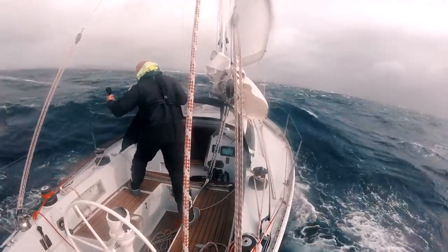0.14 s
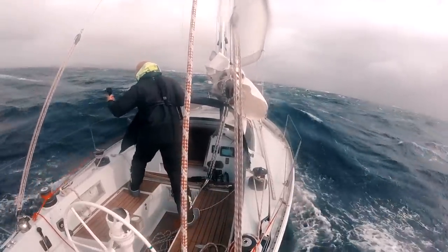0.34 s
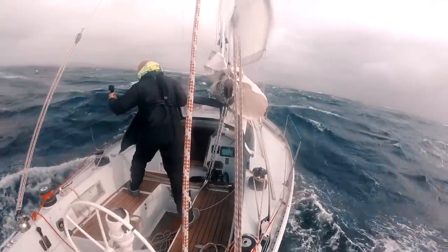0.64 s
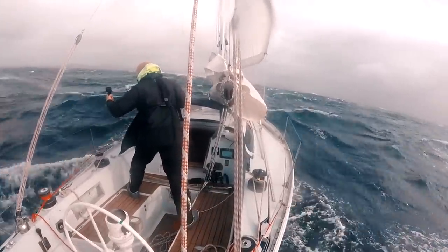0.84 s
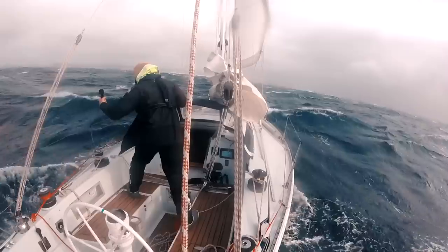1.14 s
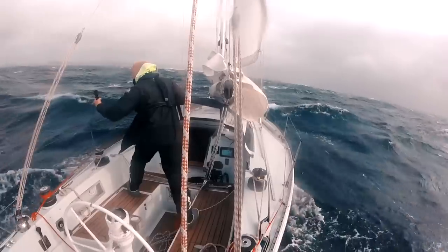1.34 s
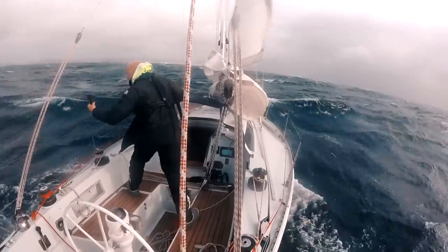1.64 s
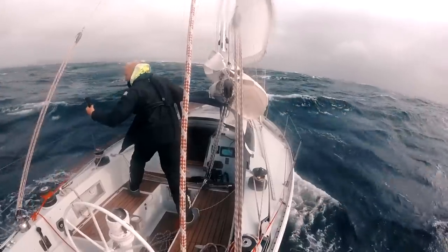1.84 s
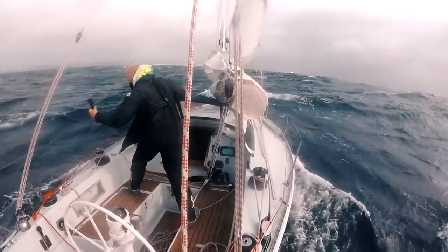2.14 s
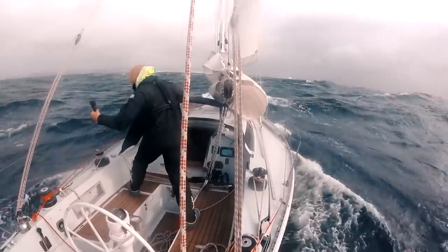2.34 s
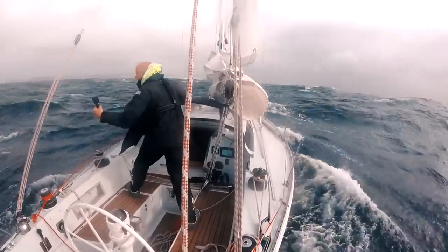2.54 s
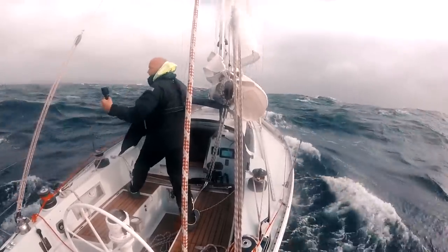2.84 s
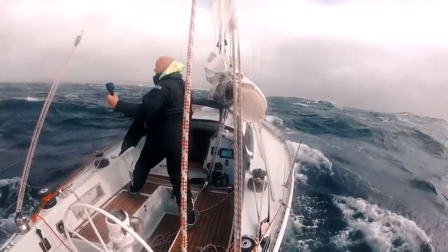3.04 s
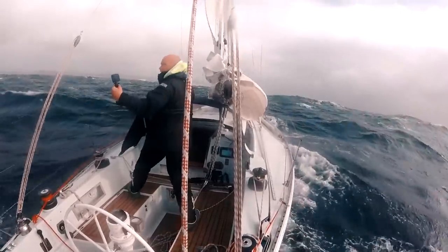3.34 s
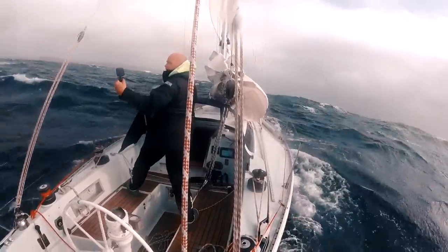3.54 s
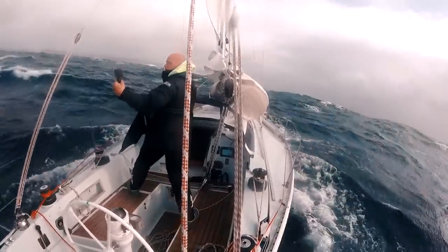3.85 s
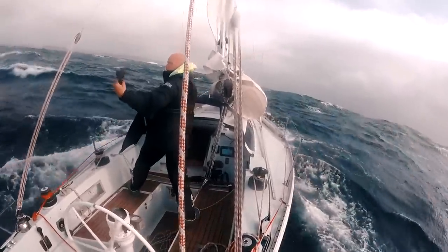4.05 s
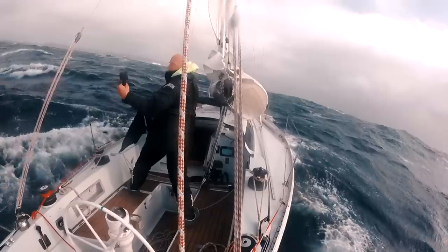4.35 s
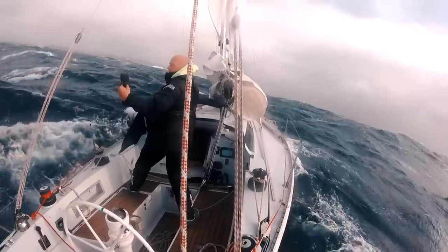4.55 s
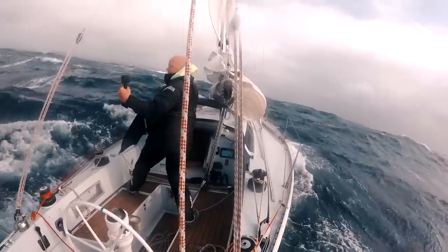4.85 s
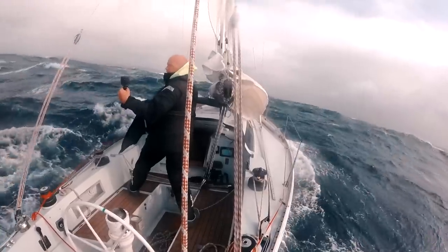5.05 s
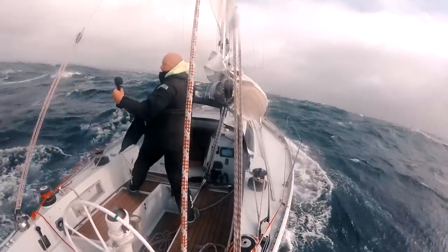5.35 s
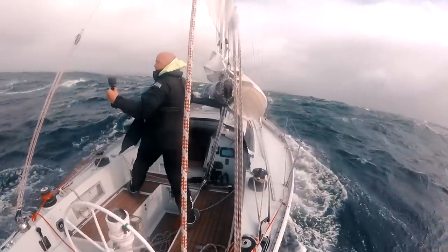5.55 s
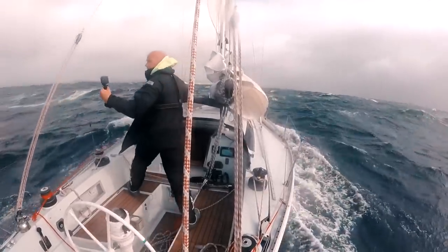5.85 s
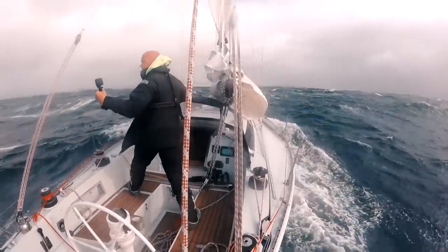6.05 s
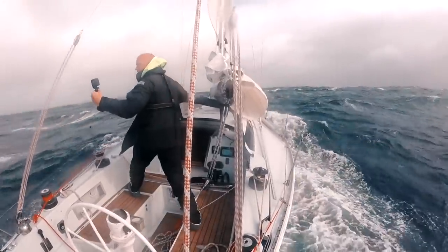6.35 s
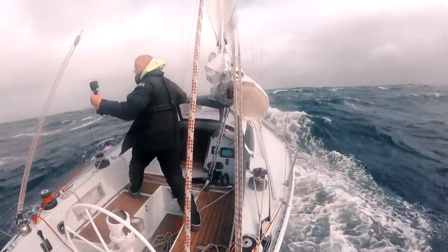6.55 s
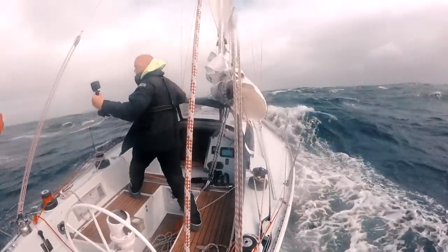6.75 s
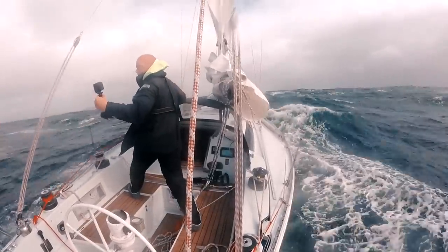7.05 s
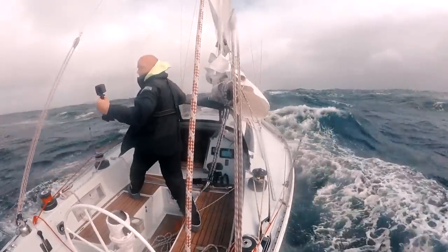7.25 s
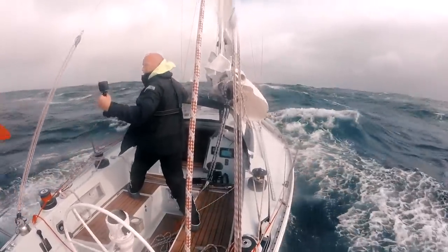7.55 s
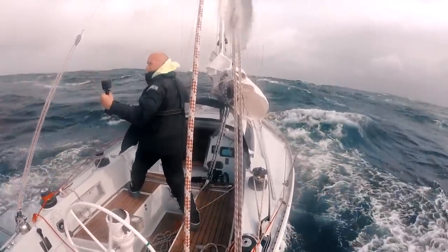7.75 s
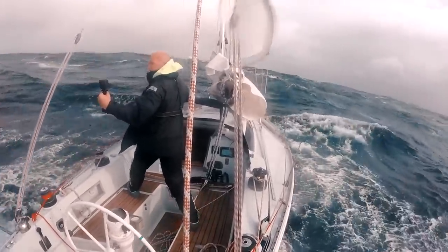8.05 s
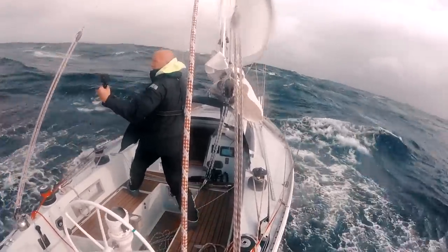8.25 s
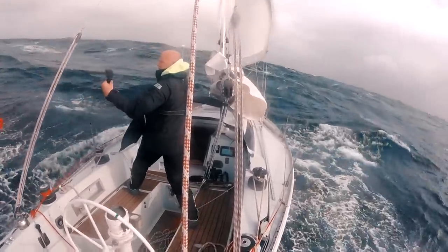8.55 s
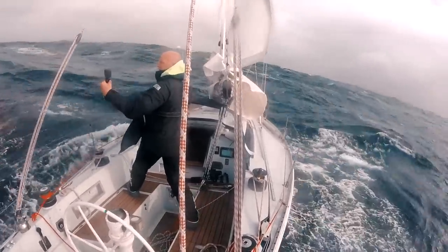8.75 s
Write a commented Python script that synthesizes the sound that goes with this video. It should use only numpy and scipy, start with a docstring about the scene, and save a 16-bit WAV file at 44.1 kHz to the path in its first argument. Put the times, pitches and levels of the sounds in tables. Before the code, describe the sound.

Strong wind buffets a microphone at the stern of a sailboat, making a heavy, uneven rumble throughout. Beneath it, water washes along the hull, foam fizzes and the rigging sings faintly. Two waves slap the boat early on, the second with a solid thud and a hiss of spray. A few drops then tick on the microphone's case, and near the end heavy gear clunks and a fitting knocks.

```python
"""A sailing yacht in a gale

Heard from a camera in a waterproof case at the stern, wind shakes the case with a heavy rumble and
sings in the wires that hold the mast. Water washes along the hull and its bubbles fizz as foam.
Now and then spray flies over, a drop ticks on the case, a wave slaps the boat or a pressure jump pops.
A tight rope squeaks; near the end, heavy gear clunks and a deck fitting knocks."""
import sys
import numpy as np
from scipy import signal
from scipy.fft import rfft, irfft, next_fast_len
from scipy.io import wavfile
from scipy.ndimage import uniform_filter1d, minimum_filter1d, map_coordinates

SR = 44100
rng = np.random.default_rng(int(sys.argv[2]) if len(sys.argv) > 2 else 0)


def waveform_to_disk(signal):
    """Save audio, clipped to [-1, 1], as 16-bit WAV at the path in sys.argv[1]."""
    frames = np.transpose(np.atleast_2d(signal))
    scaled = np.clip(frames, -1, 1) * 32767
    samples = np.round(scaled).astype(np.int16)
    wavfile.write(sys.argv[1], SR, samples)


N = 393061

# Levels in the tables are relative: the functions add their own gains.
# wind on the case between gusts: t/s, rumble level/dB, level of the eddies (small swirls of air)/dB
WIND = [(0, -2.5, -0.5), (.65, 0.5, 4), (1.25, -2.5, 0.5), (1.75, 0.5, -2), (2.05, -7, 0), (2.45, -1, 1),
        (2.75, -3.5, 2.5), (3.3, 1.5, -3.5), (3.7, -2.5, 2), (4.3, 0.5, 0), (5.05, -3.5, 0.5), (5.8, 2, -1),
        (6.55, -1.5, -1), (7.15, -3, 4.5), (8.05, -2, 2), (8.85, -1, 2)]
# gusts that strike the case: t/s, length/s, rumble rise/dB, eddy rise/dB
GUSTS = [(0.13, 0.017, 6, -3), (0.211, 0.053, 5.5, 10), (0.277, 0.022, 9, 11), (0.533, 0.019, -1, 2.5),
         (0.636, 0.049, -1.5, 4.5), (0.72, 0.046, 2.5, 6), (0.854, 0.026, 5, 4), (0.977, .035, 5, 2.5),
         (1.068, 0.044, 5, 9), (1.153, 0.038, 11.5, 4), (1.3, 0.042, 9, 3), (1.459, 0.086, 4, 6.5),
         (1.814, 0.045, 2, 1), (2.19, 0.046, 8, 8.5), (2.319, 0.071, 3, 8.5), (2.438, 0.022, 6, 1),
         (3.075, 0.033, 6.5, 8), (3.25, 0.1, 3.5, 6.5), (3.389, 0.047, 2.5, 8), (3.947, 0.024, 5.5, 7),
         (4.178, 0.06, 5.5, -1), (4.736, 0.1, 5.5, 6), (5.148, 0.095, 3.5, -4), (5.317, 0.042, 8, 9),
         (5.421, 0.049, 7, 2.5), (5.621, 0.021, 12.5, 14), (5.785, 0.028, 1.5, 9.5),
         (6.122, 0.091, 5.5, 8.5), (6.26, 0.045, 8.5, 9.5), (6.43, 0.092, -0.5, 6), (6.526, 0.037, 3, 12),
         (6.743, 0.067, 5.5, 10), (7.133, 0.017, 6.5, 13), (7.254, 0.13, 7.5, 4.5),
         (7.584, 0.027, 8.5, 2.5), (7.673, 0.026, 13, -6), (7.84, 0.053, 10.5, 6), (7.902, 0.049, 7, 1.5),
         (8.132, 0.044, 7.5, -2), (8.207, 0.029, 12.5, 2), (8.43, 0.061, 0.5, 6), (8.605, 0.059, 7.5, 2)]
# lulls, when the air briefly lets go of the case: t/s, length/s
LULLS = [(0.318, 0.037), (0.476, 0.054), (1.017, 0.019), (1.382, 0.02), (1.63, .025), (2.258, 0.059),
         (2.68, 0.043), (2.856, 0.019), (3.653, 0.11), (3.875, 0.074), (4.125, 0.016), (4.493, 0.031),
         (4.834, 0.051), (5.053, 0.021), (5.525, 0.21), (6.206, 0.042), (6.365, 0.05), (6.591, 0.041),
         (6.967, .03), (7.067, 0.017), (7.357, 0.083), (7.44, 0.024), (7.528, 0.037), (7.738, 0.098),
         (8.015, 0.014)]
# surges in the gale's roar: t/s, length/s, rise/dB
SURGES = [(0.252, .07, 3.5), (2.137, .1, 5.5), (3.195, 0.12, 6.5), (6.072, .07, 8), (6.933, 0.13, 4.5),
          (7.582, .04, 12.5), (8.325, 0.022, 1)]
# tone colours of the wind: f/Hz, level/dB
RUMBLE_TONE = [(5, -30.5), (12, 0.5), (25, 1), (35, 0.5), (48, 0.5), (70, -4), (95, -16), (140, -37),
               (220, -46), (400, -79.5), (900, -120)]
EDDY_TONE = [(50, -30.5), (85, 4), (110, 2), (145, -5), (200, -13), (270, -27), (330, -33.5), (600, -48.5),
             (1500, -74.5), (4000, -120)]
ROAR_TONE = [(100, -16), (190, 5), (280, 2), (330, -7), (420, -16.5), (520, -16.5), (900, -56)]
# notes of two singing wires and of the stays (thick mast cables): f/Hz, width/Hz, level/dB
WIRE_NOTES = [(648, 46, -63.5), (878, 56, -64.5)]
STAY_NOTES = [(400, 30, -61.5), (436, 140, -82)]
# swells in the singing: t/s, length/s, thick wire rise/dB, thin wire rise/dB
WIRE_SWELLS = [(3.134, 0.14, 3, 16), (3.644, 0.24, 7.5, 9), (5.322, 0.23, 6, 2), (7.025, 0.16, 13.5, 5),
               (7.72, 0.16, 9, -6), (8.055, 0.23, 8, 5)]

# water swelling as each wave passes: t/s, foam level/dB, spray level/dB
PASSING_WAVES = [(0, 0.5, 1), (.4, -5.5, -5.5), (.52, 1, -3), (.8, 2, 3), (1.08, -0.5, 0), (1.35, 3, 1.5),
                 (1.7, 1.5, 0), (2.1, 6.5, 1), (2.35, 0.5, 0.5), (2.72, 0, -2), (2.87, 3, 1),
                 (3.24, 1.5, 5), (3.5, 1.5, 0), (3.98, -4, -2), (4.22, -3, -3), (4.5, 4, 0), (4.85, -4, -3),
                 (5.9, -3, -4.5), (6.15, -3, -2), (6.32, 1.5, -0.5), (6.75, 0, 1), (7.25, 0, -0.5),
                 (7.75, -3.5, -3.5), (8.4, 2, 1), (8.85, 1.5, -2)]
# wave crests that break beside the hull: t/s, length/s, rise/dB
CRESTS = [(0.177, 0.1, 7), (0.712, 0.02, 1), (1.92, 0.031, 4), (2.119, 0.11, 4.5), (2.435, 0.03, 9.5),
          (2.517, 0.1, 5), (4.48, .04, 3.5), (6.047, 0.06, 6), (6.685, 0.11, 3.5), (7.105, 0.099, 4.5)]
# short sloshes against the hull: t/s, foam rise/dB
SLOSHES = [(1.27, 2), (1.39, 2.5), (4.1, 5.5), (4.19, 5), (4.27, 7.5), (4.365, 3.5), (4.57, 3.5),
           (4.655, 7), (4.745, 5), (4.93, 4.5), (5.035, 4.5), (5.315, 3.5), (8.425, 4)]
# strength of the low wash and of the fine mist: t/s, level/dB
WASH_LEVELS = [(0, -3), (.8, 1), (2.2, 0), (3, 1), (4.1, -1.5), (5.4, -1), (5.75, -2.5), (6.7, 0.5),
               (7.6, 0), (8.4, -0.5), (8.85, 0.5)]
MIST_LEVELS = [(0, 5), (.4, -2.5), (1, 4), (1.2, 1), (2, 0.5), (2.8, 0), (3.4, 1), (3.78, 4.5), (4, -0.5),
               (4.6, 0.5), (5, -2), (5.8, -3.5), (6.3, -4), (6.8, 0), (7.7, -2), (8.85, 0.5)]
# ring of the foam, higher for finer bubbles: t/s, f/Hz
FOAM_PITCH = [(0, 2500), (1.08, 2410), (1.6, 2640), (1.85, 2360), (2.3, 2440), (2.9, 2760), (3.25, 2810),
              (3.5, 2470), (4.3, 2370), (5.9, 2440), (6.3, 2730), (6.8, 2650), (7.5, 2310), (8.85, 2430)]
# the two rings that this pitch blends between: coarse foam f/Hz, fine foam f/Hz
FOAM_RINGS = [2360, 2730]
# tone colours of the water: f/Hz, level/dB
WASH_TONE = [(150, -25), (350, -8.5), (480, 6), (750, 3.5), (1300, 2.5), (1700, 0.5), (3000, -15.5),
             (8000, -40.5)]
FOAM_TONE = [(900, -31.5), (1550, -14.5), (1850, -7), (2400, -3.5), (3000, -4), (3800, -13), (5000, -14.5),
             (9000, -48.5)]
SPRAY_TONE = [(1500, -27.5), (3000, 7), (4000, 6), (5000, -0.5), (7000, -6), (8200, -14), (10000, -19.5),
              (11500, -32), (15800, -46.5)]
MIST_TONE = [(3000, -17.5), (6000, -7), (8000, -4.5), (10000, 0), (11500, -8), (14000, -15.5),
             (15800, -31.5)]
# sheets of water and spray: high hisses flying past, and one low swell of wash before a wave hits:
# t/s, half length/s, level/dB, start f/Hz, end f/Hz, width/Hz
WATER_SHEETS = [(0.23, .03, -51, 3250, 4520, 1900), (0.809, .07, -57, 4170, 4600, 1600),
                (2.135, 0.046, -52.5, 4200, 5200, 3000), (2.582, 0.048, -56, 5000, 6000, 3000),
                (3.078, .042, -43.5, 2900, 3600, 1700), (3.124, .04, -52, 5700, 6900, 1500),
                (3.167, .026, -56.5, 7980, 10400, 3200), (3.222, .08, -43, 600, 902, 1490),
                (4.511, .035, -51.5, 4000, 4600, 3200)]

# drops landing on the case: t/s, tick level/dB, tap level/dB
DROPS = [(2.101, -43.5, -59), (4.7208, -37.5, -38.5), (4.9615, -48, -41), (5.1574, -37, -42.5),
         (6.0017, -43.5, -65), (6.9163, -36.5, -57), (7.1148, -36.5, -53)]
# tone colour of a drop's tick: f/Hz, level/dB
TICK_TONE = [(1500, -15), (5200, 5), (8000, -3), (11000, 6), (15000, -5)]
# waves hitting the boat: t/s, rise/s, fall/s, thud level/dB, slap level/dB, splash level/dB
WAVE_HITS = [(2.201, 0.022, 0.0098, -27.5, -52, -40), (3.317, 0.014, 0.016, -14.5, -34.5, -61)]
# tone colours of a wave's hit: f/Hz, level/dB
THUD_TONE = [(60, -4.5), (150, 0.5), (260, 0.5), (350, -11.5), (460, -14), (700, -43), (2000, -77.5)]
SLAP_TONE = [(150, -9), (350, -8), (470, -6), (750, 5.5), (1150, 7), (1420, 0), (1750, -28), (4000, -33),
             (10000, -61.5)]
SPLASH_TONE = [(800, -17), (2000, 13), (3400, 1), (5000, 1), (7000, -12), (9000, -8), (12000, -35),
               (15800, -42.5)]
# pitches that the hull's panels boost or weaken: f/Hz, width/Hz, gain/dB
HULL_RINGS = [(467, 130, 1), (1220, 160, 0), (1400, 120, -7)]
# pressure jumps at the microphone opening: t/s, level/dB
POPS = [(3.314, -23), (3.333, -23), (6.123, -20.5), (7.278, -23)]

# squeak of a tight rope: t/s, f/Hz, level/dB
SQUEAK = [(5.21, 1793, -78), (5.228, 1725, -54), (5.275, 1760, -55), (5.29, 1810, -85)]
# heavy gear scrapes, clunks and settles: t/s, rise/s, fall/s, body level/dB, rattle level/dB
CLUNKS = [(7.95, .008, 0.044, -40, -64), (8.007, .002, .008, -32, -45), (8.012, 0.0025, 0.012, -25, -43.5),
          (8.025, 0.0036, .011, -26, -42.5), (8.04, 0.0022, .009, -38, -53),
          (8.051, .002, 0.0083, -31, -49), (8.074, .004, 0.027, -36, -58),
          (8.081, .002, 0.0064, -46, -44.5)]
# tone colours of its hollow body and loose parts: f/Hz, level/dB
BODY_TONE = [(70, -6), (130, 12), (310, 4), (560, -11.5), (850, -6.5), (1150, -12), (1500, -14),
             (1900, -34), (4000, -59)]
RATTLE_TONE = [(1200, -7), (2000, -13), (3200, 3), (4300, -6.5), (6000, -12.5), (8500, -19.5), (11500, -24),
               (15000, -39)]
# pitches at which that gear rings: f/Hz, width/Hz, gain/dB
GEAR_RINGS = [(860, 84, 3.5), (3200, 310, 5), (4250, 300, 5), (5900, 350, 6.5)]
# knock of a deck fitting: t/s, level/dB
KNOCKS = [(8.172, -41)]
# notes of that fitting: f/Hz, level/dB, time to fade by 60 dB/s
FITTING_NOTES = [(660, -1.5, 0.14), (1900, -3, .027), (2000, -2, .05), (2815, -6, .025), (3200, 6.5, .02),
                 (3700, 2, 0.027), (6750, -12, .018), (8550, -8, .016)]
# pitches that the camera case boosts or weakens: f/Hz, width/Hz, gain/dB
CASE_RINGS = [(1592, 150, -4.5), (1842, 180, 4), (3334, 290, -3.5), (4205, 300, -3.5), (4710, 300, 3),
              (5030, 370, -2.5), (5840, 440, 3.5), (6380, 400, -2), (7130, 650, 5)]


def amp(db):
    """Turn decibels into a gain to multiply by."""
    return 10 ** (np.asarray(db) / 20)


def unit(x):
    """Scale x to an average strength (rms) of 1."""
    return x / np.sqrt(np.mean(x ** 2) + 1e-20)


def clock():
    """The time of every sample, in seconds."""
    return np.arange(N) / SR


def curves(rows):
    """Join a table's points with straight lines: one curve for each column after the time."""
    times, *columns = np.transpose(rows)
    return [np.interp(clock(), times, column) for column in columns]


def wobble(rate):
    """A smooth curve through rate random points a second."""
    return map_coordinates(rng.standard_normal(4096), [clock() * rate + 2], mode="wrap")


def bump(s, length):
    """A smooth rise and fall centred on time s, above half its height for length seconds."""
    return .5 ** np.minimum((2 * (clock() - s) / length) ** 2, 100)


def strikes(rows):
    """Hits that build to a sharp peak and die away: one curve for each level column."""
    force = 0
    for s, rise, fall, *levels_db in rows:
        t = clock() - s
        force += np.outer(amp(levels_db), np.exp(-np.maximum(-t / rise, t / fall)))
    return force


def filtered(x, response):
    """Scale each frequency in x by the gain response(hz)."""
    size = next_fast_len(N + SR // 2)
    return irfft(rfft(x, size) * response(np.fft.rfftfreq(size, 1 / SR)), size)[:N]


def coloured(x, tone):
    """Give x the tone colour of a table of f/Hz, level/dB."""
    points_hz, db = np.transpose(tone)
    return filtered(x, lambda hz: amp(np.interp(np.log(hz + 1), np.log(points_hz), db)))


def peak(hz, centre, width):
    """A hill of height 1 around the centre frequency."""
    return 1 / (1 + (2 * (hz - centre) / width) ** 2)


def resonant(x, rings):
    """Boost or weaken x around each pitch in rings."""
    return filtered(x, lambda hz: amp(sum(db * peak(hz, centre, width) for centre, width, db in rings)))


def rush(tone, patchy_db):
    """Rushing noise, louder and softer in random patches of time and pitch."""
    grid = signal.stft(rng.standard_normal(N), nperseg=512)[2]
    patches = uniform_filter1d(rng.standard_normal(grid.shape), size=7, axis=0)
    patches = unit(uniform_filter1d(patches, size=10, axis=1))
    noise = signal.istft(grid * amp(patchy_db * patches), nperseg=512)[1][:N]
    return unit(coloured(noise, tone))


def steadied(x, span):
    """Even out the swells in x that are slower than span seconds."""
    window = signal.windows.hann(2 * int(span * SR / 2) + 3)
    power = signal.fftconvolve(x ** 2, window, "same") / signal.fftconvolve(np.ones(N), window, "same")
    return unit(x / np.sqrt(np.abs(power) + 1e-9))


def wind():
    """Big swirls shake the case, small ones tear off it in quick lumps, and the gale roars in the sails."""
    flurries_db = 0.5 * wobble(16)
    lulls_db = -6 * sum(bump(*lull) for lull in LULLS)
    gusts_db = sum(np.outer(rises_db, bump(s, length)) for s, length, *rises_db in GUSTS)
    rumble_db, eddy_db = curves(WIND) + gusts_db + flurries_db + lulls_db
    rumble = amp(-13 + rumble_db) * steadied(rush(RUMBLE_TONE, patchy_db=6.0), span=0.085)
    lumps = amp(2.8 * wobble(45))
    eddies = amp(-26.5 + eddy_db) * steadied(lumps * rush(EDDY_TONE, patchy_db=1.5), span=0.14)
    surges_db = sum(db * bump(s, length) for s, length, db in SURGES)
    roar_db = -41 + 0.078 * eddy_db + surges_db + 1.1 * wobble(25)
    return rumble + eddies + amp(roar_db) * rush(ROAR_TONE, patchy_db=1.5)


def wire_note(note_hz, width):
    """Air swirls off a wire in a narrow, breathy note."""
    return unit(filtered(rng.standard_normal(N), lambda hz: peak(hz, note_hz, width)))


def rigging():
    """Two wires sing in the wind and swell now and then; the thick stays moan faintly below."""
    swells_db = sum(np.outer(rises_db, bump(s, length)) for s, length, *rises_db in WIRE_SWELLS)
    wires = sum(amp(db + swell_db) * steadied(wire_note(hz, width), span=1.0)
                for (hz, width, db), swell_db in zip(WIRE_NOTES, swells_db))
    follow_db = 0.53 * swells_db[0]  # the stays partly follow the thick wire
    stays = sum(amp(db + follow_db + wobble(2.006)) * wire_note(hz, width)
                for hz, width, db in STAY_NOTES)
    return wires + stays


def breaking(s, length):
    """A crest breaks quickly at time s, holds briefly and drains away."""
    break_s = 0.021
    return np.clip((clock() - s) / break_s, 0, 1) * bump(s, 2 * length)


def bubbles(tone, low_hz, high_hz, cycles, spread_db, count):
    """Many bubbles burst at random times, each with a short ring of its own pitch."""
    when, size, pitch = rng.random((count, 3)).T[:, :, None]
    age = np.arange(128)  # in samples
    turns = low_hz * (high_hz / low_hz) ** pitch * age / SR
    rings = amp(spread_db * size ** 2) * np.sin(2 * np.pi * turns) * np.exp(-turns / cycles)
    places = (when * N).astype(int) + age
    bursts = np.bincount(places.ravel(), rings.ravel(), N)[:N]  # add each ring at its place
    return unit(coloured(bursts, tone))


def foam():
    """A dense fizz of bubbles rings lower when they are coarse and higher when they are fine."""
    fizz = rush(FOAM_TONE, patchy_db=2.5)
    fizz += 0.48 * bubbles(FOAM_TONE, low_hz=1630, high_hz=3950, cycles=1.2, spread_db=19, count=12000)
    fineness = np.interp(curves(FOAM_PITCH)[0], FOAM_RINGS, [0, 1])
    width_hz, ring_db = 480, 5.5
    coarse, fine = (resonant(fizz, [(hz, width_hz, ring_db)]) for hz in FOAM_RINGS)
    blend = (1 - fineness) * coarse + fineness * fine
    return steadied(blend * amp(1.7 * wobble(110)), span=0.2)


def spray():
    """Spray is a flickering hiss mixed with small bursting bubbles."""
    fizz = rush(SPRAY_TONE, patchy_db=1.5)
    fizz += 0.59 * bubbles(SPRAY_TONE, low_hz=3320, high_hz=11800, cycles=2.7, spread_db=13, count=12000)
    return unit(fizz * amp(1.1 * wobble(50)))


def mist():
    """Fine mist is an even hiss with a sparkle of tiny droplets."""
    sparkle = bubbles(MIST_TONE, low_hz=7000, high_hz=15000, cycles=2.3, spread_db=25, count=4000)
    hiss = unit(coloured(rng.standard_normal(N), MIST_TONE))
    return unit(hiss + 0.64 * sparkle)


def sea():
    """Waves pass and break: water washes along the hull, foam sloshes, spray and mist hiss above."""
    crests_db = sum(db * breaking(s, length) for s, length, db in CRESTS)
    sloshes_db = sum(db * bump(s, length=0.049) for s, db in SLOSHES)
    foam_db, spray_db = curves(PASSING_WAVES) + crests_db + 0.65 * wobble(12)
    wash_db = curves(WASH_LEVELS)[0] + 0.41 * crests_db
    water = amp(-53 + wash_db) * rush(WASH_TONE, patchy_db=1.23)
    water += amp(-52 + foam_db + sloshes_db) * foam()
    water += amp(-55 + spray_db) * spray()
    mist_db = curves(MIST_LEVELS)[0] + 1.2 * wobble(24)
    return water + amp(-71 + mist_db) * mist()


def water_sheets():
    """Water rushes past, rising in pitch: high hisses of thinning spray, and one low swell of wash."""
    out = np.zeros(N)
    flicker = unit(amp(2.9 * wobble(400)))
    for s, half_length, db, start_hz, end_hz, width_hz in WATER_SHEETS:
        noise = unit(filtered(rng.standard_normal(N), lambda hz: 1 / (1 + (hz / width_hz) ** 2) ** 2))
        progress = (clock() - s) / half_length
        centre_hz = np.interp(progress, [-1, 1], [start_hz, end_hz])
        band = noise * np.cos(2 * np.pi * np.cumsum(centre_hz) / SR)  # moves the noise up to centre_hz
        swell = np.exp(-np.minimum(progress ** 2 / 2, 100))
        out += amp(db) * swell * band
    return out * flicker


def drops():
    """Each drop is a tiny bright tick; the heavy ones also ring the case in a short tap."""
    tick_s, tap_s, tap_hz = 0.001, 0.0011, 4430
    ticks, taps = np.zeros((2, N))
    for s, tick_db, tap_db in DROPS:
        t = np.maximum(clock() - s, 0)
        ticks += amp(tick_db - 8) * (t > 0) * np.exp(-t / tick_s)
        taps += amp(tap_db) * np.exp(-t / tap_s) * np.sin(2 * np.pi * tap_hz * t)
    return ticks * unit(coloured(rng.standard_normal(N), TICK_TONE)) + taps


def wave_slaps():
    """A wave thuds on the hull, claps on its panels in ragged lumps and throws a splash."""
    ragged = unit(amp(1.47 * wobble(300)))
    water = sum(force * steadied(rush(tone, patchy_db=3.0), span=0.048)
                for force, tone in zip(strikes(WAVE_HITS), (THUD_TONE, SLAP_TONE, SPLASH_TONE)))
    return amp(-1.5) * resonant(ragged * water, HULL_RINGS)


def pressure_pops():
    """The pressure at the microphone opening drops suddenly and leaks back: a dull pop."""
    leak_s, cutoff_hz = .004, 1400
    steps = sum(-amp(db) * (clock() >= s) * np.exp(-np.abs(clock() - s) / leak_s) for s, db in POPS)
    return filtered(steps, lambda hz: 1 / (1 + (hz / cutoff_hz) ** 8))


def rope_squeak():
    """A rope under load slips and squeaks once at an unsteady pitch."""
    pitch_hz, level_db = curves(SQUEAK)
    slipping = (clock() > SQUEAK[0][0]) & (clock() < SQUEAK[-1][0])
    phase = 2 * np.pi * np.cumsum(pitch_hz * (1 + 0.017 * wobble(350))) / SR
    return amp(level_db + 1.5) * slipping * np.sin(phase)


def gear_clunk():
    """Each hit of the shifting gear sounds its hollow body and rattles its loose metal parts."""
    body_force, rattle_force = strikes(CLUNKS)
    body, rattle = (steadied(resonant(rush(tone, patchy_db=1.0), GEAR_RINGS), span=0.015)
                    for tone in (BODY_TONE, RATTLE_TONE))
    chatter = unit(amp(1.8 * wobble(450)))
    return body_force * body + rattle_force * rattle * chatter


def fitting_knock():
    """A fitting knocks on the deck and rings with several quickly fading notes."""
    out = np.zeros(N)
    for s, db in KNOCKS:
        t = np.maximum(clock() - s, 0)
        for hz, note_db, fade_s in FITTING_NOTES:
            fade_db = -60 * np.minimum(t / fade_s, 2)
            out += amp(db + note_db + fade_db) * np.sin(2 * np.pi * hz * t)
    return out


def scene():
    """Add up the wind, water and gear in one channel."""
    gale = wind() + rigging() + sea()
    splashes = water_sheets() + drops() + wave_slaps()
    return (gale + splashes + pressure_pops() + rope_squeak() + gear_clunk() + fitting_knock())[None]


def record(dry):
    """The case colours the sound, a limiter turns down the biggest peaks, and the top treble is cut."""
    ceiling, fade_in_s, top_hz = .87, 0.0021, 15800
    boxed = resonant(dry[0], CASE_RINGS)
    needed_gain = ceiling / np.maximum(np.abs(boxed), ceiling)
    smooth_gain = uniform_filter1d(minimum_filter1d(needed_gain, size=1200), size=900)
    fade_in = np.sin(np.pi / 2 * np.minimum(clock() / fade_in_s, 1)) ** 2
    return filtered(boxed * smooth_gain * fade_in, lambda hz: hz < top_hz)[None]


dry = scene()
out = record(dry)
waveform_to_disk(out)
```